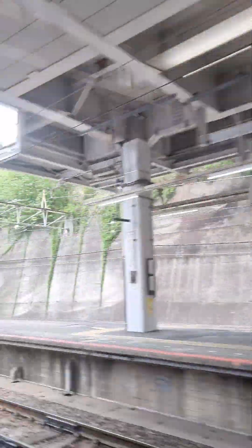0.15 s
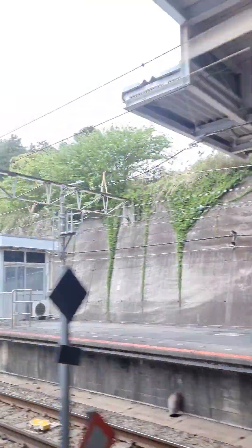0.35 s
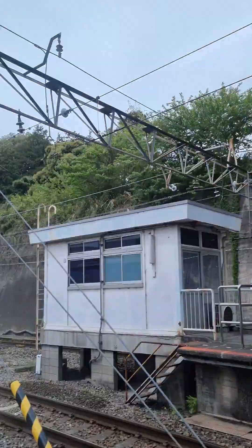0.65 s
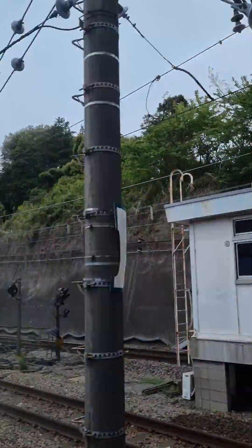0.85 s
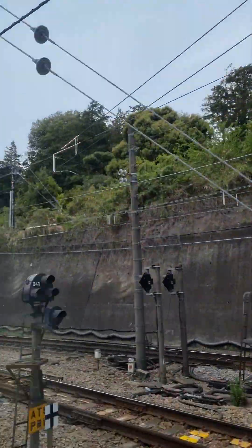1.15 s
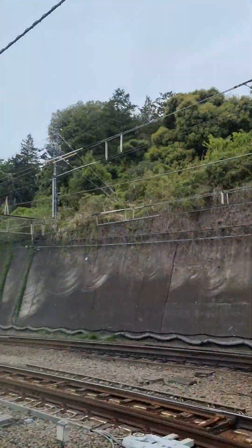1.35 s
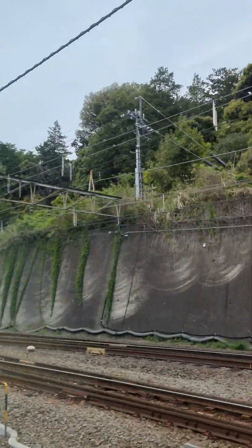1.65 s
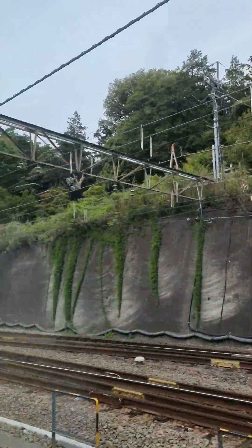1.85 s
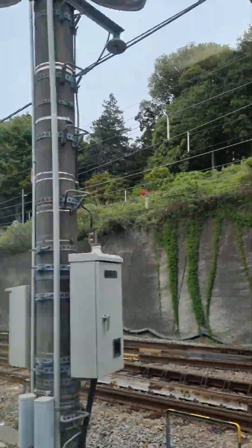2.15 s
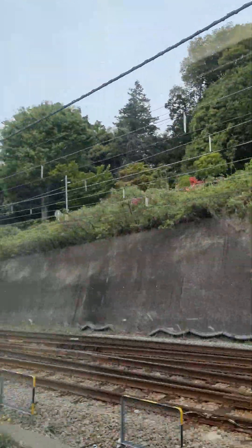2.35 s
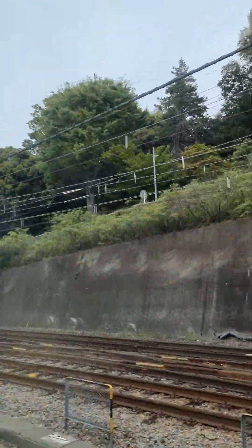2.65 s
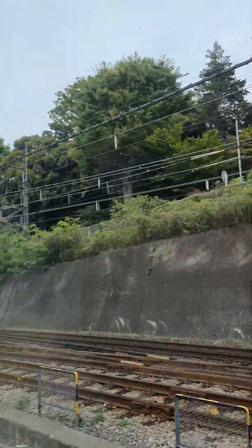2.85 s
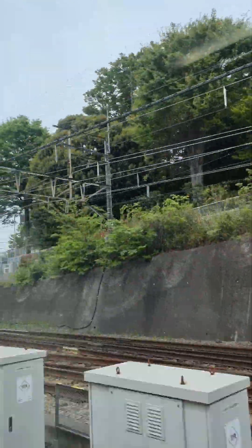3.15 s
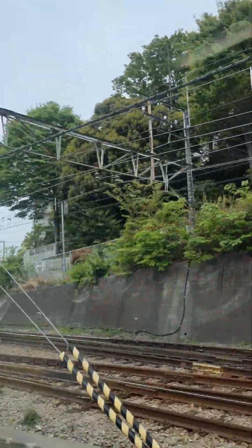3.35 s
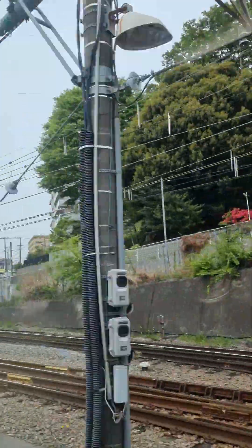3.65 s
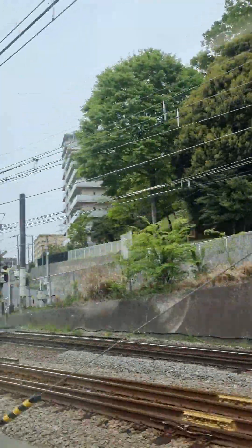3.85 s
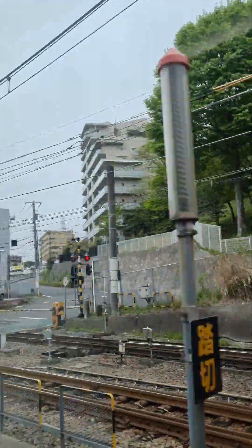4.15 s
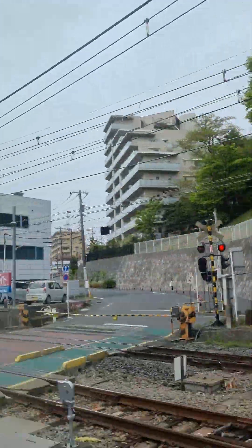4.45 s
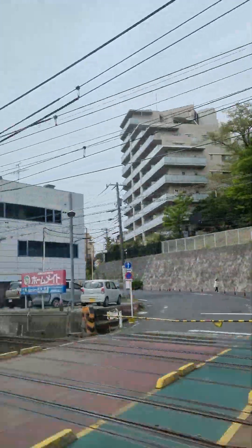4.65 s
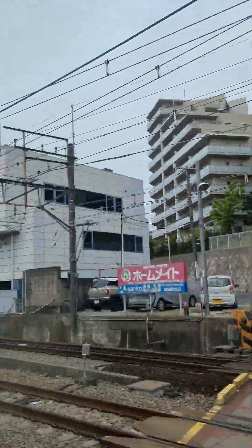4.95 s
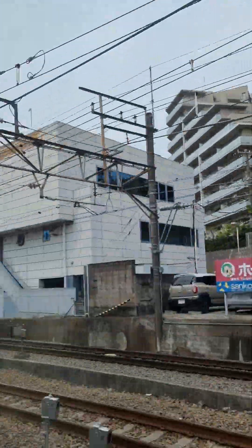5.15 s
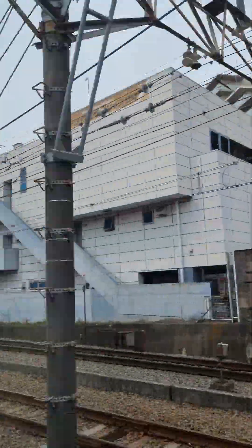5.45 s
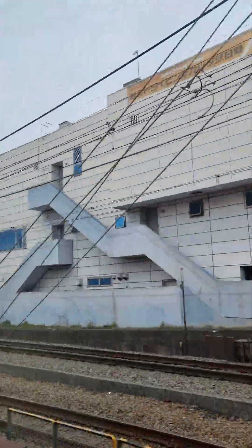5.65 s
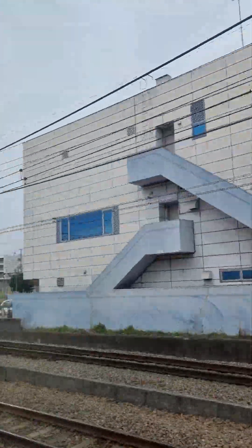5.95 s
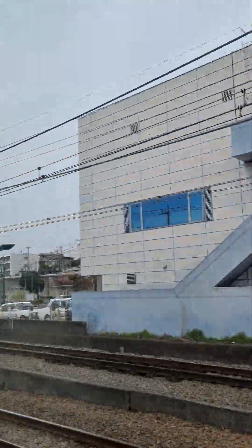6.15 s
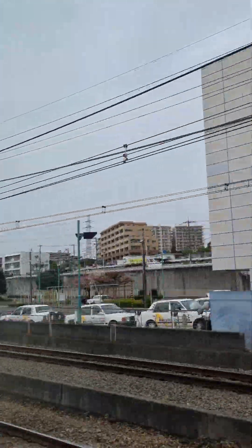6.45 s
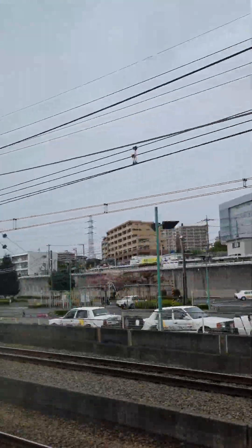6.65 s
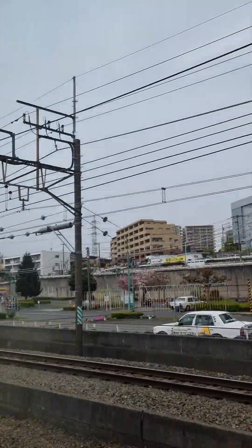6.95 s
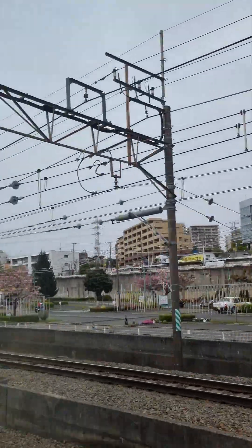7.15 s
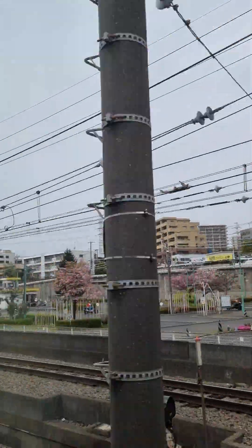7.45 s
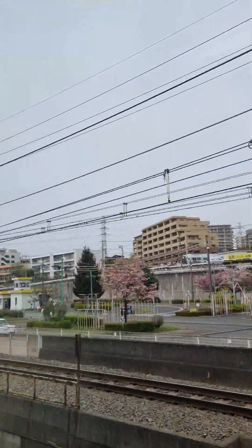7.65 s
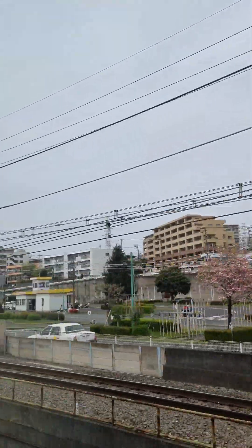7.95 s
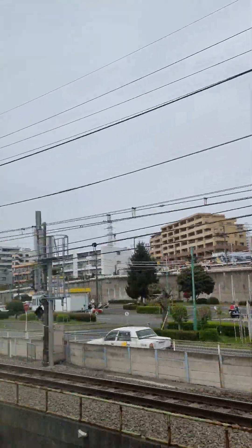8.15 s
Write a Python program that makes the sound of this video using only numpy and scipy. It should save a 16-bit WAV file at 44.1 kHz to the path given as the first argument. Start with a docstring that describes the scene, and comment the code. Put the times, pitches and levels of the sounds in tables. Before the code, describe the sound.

Inside an electric train carriage, close and bass-heavy in stereo. From 0 s a low floor hum near 60 Hz and soft rolling roar continue under small bright rattles and metallic ticks; a thin, faint motor whine wobbles and mostly fades by 1.5 s. Paired thuds come at 0.7 and 1.7 s. Between 2.0 and 2.4 s wheels hit points hard, with booming blows, panel knocks and dull ringing clanks. Roar dips, then two more heavy clusters strike around 3.1-3.4 and 3.5-3.8 s, the loudest, with dense trembling of loose parts. Lighter thuds follow at 4.2 and 4.7 s, one at 5.5 s. Then the ride smooths into steady rumble, with a sharp rattle at 6.1 s. Short quiet crackling air puffs appear from 4.2 s, more regularly from 6 to 8 s. Weak knocks come at 7.8 and 8.2 s, with a barely audible high squeak from 8.1 s.

```python
"""Wheel blows over points and joints thud through the floor of an electric train, then become sparse.
Decaying noise and struck resonances make the thuds, panel knocks, wheel clatter, rattles and clanks.
Filtered noise that follows the ride makes rumble, roar and hiss; noise bands and wavering tones hum.
A motor whine of two sine lines fades early; short puffs of crackling hiss, perhaps from an air valve,
come in a row in the second half, and a faint squeak of high overtones sounds close to the end."""
import sys
import numpy as np
from scipy import signal
from scipy.fft import rfft, irfft, next_fast_len
from scipy.io import wavfile

SR = 44100
rng = np.random.default_rng(int(sys.argv[2]) if len(sys.argv) > 2 else 0)


def wav_out(sig):
    """Save sig, one row per channel (or a flat mono array), as 16-bit PCM at SR to the path in sys.argv[1]."""
    wavfile.write(sys.argv[1], SR, np.round(np.clip(np.atleast_2d(sig).T, -1, 1) * 32767).astype(np.int16))


N = 366012

# the ride between blows: time_s, wheel_roar_db, rail_song_db, body_boom_db
RIDE = [(0.0, -36.5, -50, -38.5), (0.58, -35.5, -50, -33.5), (0.74, -28, -50.5, -25.5),
        (0.95, -36, -51.5, -28), (1.52, -36, -48.5, -30), (2.12, -23.5, -40, -19),
        (2.24, -24, -48.5, -26.5), (2.31, -23.5, -41.5, -21), (2.6, -27.5, -46.5, -27),
        (2.75, -30.5, -52, -27), (2.82, -29.5, -44.5, -29), (3.19, -19, -41, -16),
        (3.54, -28.5, -46.5, -33.5), (3.86, -17, -44.5, -16), (4.02, -23, -44.5, -20),
        (4.25, -31, -54, -34.5), (4.32, -27, -46, -21.5), (4.74, -30, -45, -26), (5.6, -28.5, -43.5, -29),
        (6.05, -32, -45, -27), (6.66, -32, -45, -28.5), (7.86, -31, -45, -34), (8.3, -34, -47, -29)]
# wheel blows at joints: start_s, level_db, t60_s
WHEEL_BLOWS = [(0.659, -19.5, 0.44), (0.749, -18.5, 0.34), (1.249, -29, 0.4), (1.636, -19, 0.36),
               (1.716, -18, 0.78), (2.027, -19.5, 0.37), (2.072, -12, 0.32), (2.135, -17.5, 0.36),
               (2.294, -9.5, 0.34), (2.373, -6, 0.32), (2.783, -15.5, 0.23), (2.854, -12.5, 0.42),
               (3.108, -16, 0.41), (3.255, -9, 0.38), (3.329, -6, 0.33), (3.502, -19, 0.41),
               (3.594, -11.5, 0.27), (3.734, -6.5, 0.46), (3.817, -4, 0.27), (4.159, -21, 0.33),
               (4.239, -18, 0.41), (4.682, -14.5, 0.5), (4.768, -12, 0.24), (5.54, -21, 0.22),
               (7.767, -24.5, 0.28), (8.235, -27, 0.25)]
# resonances of the floor panels: pitch_hz, level_db, t60_s
PANEL_MODES = [(380, 5.5, 0.041), (515.8, -9, 0.11), (631, -16.5, 0.16), (860, -18.5, 0.039)]
# small parts trembling: time_s, level_db
TREMBLE_LEVEL = [(0.0, -64), (0.35, -66.5), (0.55, -62.5), (1.31, -67), (1.85, -59), (2.7, -60.5),
                 (3.23, -54.5), (4.16, -65), (4.88, -66), (5.34, -69), (7.93, -68), (8.3, -70)]
# noise spectrum of the highest treble: pitch_hz, level_db (per Hz, relative)
TOP_SPECTRUM = [(7000, -120), (9000, -37), (10500, -5.5), (12500, -3), (15500, -4.5)]


def from_db(db):
    """Amplitude gain is ten to the power of decibels over twenty."""
    return 10 ** (np.asarray(db) / 20)


def rms_one(x):
    """Normalize the mean power to 1."""
    return x / np.sqrt(np.mean(x ** 2) + 1e-20)


def in_time(rows):
    """Linear interpolation turns each column after the time column into a curve over all samples."""
    s, *columns = np.transpose(rows)
    return [np.interp(np.arange(N) / SR, s, column) for column in columns]


def at_hz(points, hz):
    """A spectral envelope is interpolated along a logarithmic frequency axis."""
    table_hz, table_db = np.array(points)[:, 0], np.array(points)[:, 1]
    return np.interp(np.log(hz + 1), np.log(table_hz + 1), table_db)


def drift(rate_hz):
    """Slow random modulation: white noise through two equal one-pole low-passes, rms 1."""
    step, settle = 40, 2000   # samples between drawn points; points dropped while the filter settles
    r = np.exp(-2 * np.pi * rate_hz * step / SR)
    white = rng.standard_normal(N // step + settle + 2)
    slow = signal.lfilter([1], [1, -2 * r, r * r], white)[settle:]
    return np.interp(np.arange(N) / step, np.arange(len(slow)), rms_one(slow))


def noise(spectrum):
    """Diffuse field: stereo noise whose colour, correlation and balance vary with frequency; mid rms 1."""
    # correlation of the two sides: pitch_hz, left_right_likeness
    likeness = [(60, 0.97), (110, 1), (200, 0.98), (380, 0.29), (700, -0.63), (1290, -0.66), (2380, -0.06),
                (4400, -0.13), (8120, -0.08), (15000, 0.01)]
    # balance of the two sides: pitch_hz, left_minus_right_db
    balance = [(60, -5), (150, -1.2), (380, -6.5), (950, -2), (2380, -8), (5980, -3.5), (15000, 0.3)]
    size = next_fast_len(N)
    hz = np.arange(size // 2 + 1) * SR / size
    mid, side = rfft(rng.standard_normal((2, size)))
    alike = np.clip(at_hz(likeness, hz), -.95, .995)
    side = side * np.sqrt((1 - alike) / (1 + alike))   # this ratio of powers sets the correlation
    side_gains = from_db(np.outer([.5, -.5], at_hz(balance, hz)))
    colour = from_db(at_hz(spectrum, hz))
    pair = irfft(colour * side_gains * [mid + side, mid - side], size)[:, :N]
    return pair / np.sqrt(np.mean(pair.mean(axis=0) ** 2))


def decays(times, levels_db, t60s, rise_s):
    """Reverberant decay: each blow rises quickly and falls exponentially; the powers add."""
    power, t = np.zeros(N + SR), np.arange(SR) / SR
    for s, db, t60 in zip(times, levels_db, t60s):
        at = round(s * SR)
        fall = from_db(db - 60 * t / max(t60, .02))
        power[at:at + SR] += (fall * (1 - np.exp(-t / rise_s))) ** 2
    return np.sqrt(power[:N])


def wavering_tone(hz, db, waver_db, rate_hz):
    """Amplitude modulation: a sine of given rms level, its phase the sum of its pitch, wavers at random."""
    level = np.sqrt(2) * from_db(db + waver_db * drift(rate_hz))
    return level * np.sin(2 * np.pi * np.cumsum(hz) / SR)


def ring(s, db, hz, t60):
    """Modal resonance: contacts softened by a low-pass set one damped mode ringing at times s."""
    clicks = np.full(N, 1e-18)
    clicks[np.round(np.multiply(s, SR)).astype(int)] = from_db(db)
    contact = signal.sosfilt(signal.butter(4, 1.25 * hz, fs=SR, output="sos"), clicks)
    r, w = from_db(-60 / (t60 * SR)), 2 * np.pi * hz / SR
    return signal.lfilter([0, np.sin(w)], [1, -2 * r * np.cos(w), r * r], contact)


def struck(modes, s, db, spread_db):
    """Modal superposition: every blow excites every mode with a random strength of its own."""
    chance_db = rng.normal(0, spread_db, (len(s), len(modes)))
    rings = [ring(s, db + mode_db + chance_db[:, k], hz, t60) for k, (hz, mode_db, t60) in enumerate(modes)]
    return sum(rings)


def follows(db, share, fade_db_per_s=0):
    """Level coupling: db is shifted by a share of the roar's swing about its mean and by a steady fade."""
    roar_db = in_time(RIDE)[0]
    fade_db = fade_db_per_s * (np.arange(N) - N / 2) / SR   # zero at mid-ride
    return db + share * (roar_db - roar_db.mean()) - fade_db


def floor_line():
    """Narrow-band tone: a low, fairly steady hum of the floor wanders a little in pitch."""
    # low floor tone: time_s, level_db
    floor_level = [(0, -32.5), (1.0, -33), (1.5, -36), (2.2, -28.5), (2.8, -30), (3.6, -32.5), (4.5, -28),
                   (5.2, -31.5), (5.8, -31.5), (8.3, -34)]
    hz = 58.5 + 1.6 * drift(2.99)
    return wavering_tone(hz, in_time(floor_level)[0], waver_db=1.2, rate_hz=5.3) * from_db([[1], [-1]])


def carriage():
    """Broadband rolling noise: hum, boom, roar, song and hiss; a shared roughness moves the last three."""
    # noise spectra of five layers: pitch_hz, level_db (per Hz, relative)
    hum_spectrum = [(10, -39.5), (20, -11), (32, -9.5), (44, -10.5), (58, -6.5), (68, -5.5), (78, -6.5),
                    (90, -18.5), (130, -59.5), (250, -130)]
    boom_spectrum = [(45, -46.5), (70, -12), (84, -1), (98, 1), (112, 1.5), (124, -7), (140, -15.5),
                     (180, -27), (300, -87), (500, -130)]
    roar_spectrum = [(76, -20.5), (130, -0.5), (134, -6), (156, 1), (178, -2), (215, 1), (275, -2),
                     (295, -12.5), (318, -5.5), (363, -7.5), (450, -14.5), (527, -18), (620, -27),
                     (810, -63), (1360, -120)]
    song_spectrum = [(330, -47.5), (560, 3), (623, -1.5), (678, 0), (808, -4), (912, -5), (1060, -7.5),
                     (1190, -9.5), (1440, -18.5), (1700, -24), (2210, -53.5), (3740, -120)]
    hiss_spectrum = [(710, -29), (1200, -14), (1460, -11), (1830, -5), (2360, -11.5), (2870, -12),
                     (3480, -15), (6860, -23.5), (7720, -26), (8140, -43.5), (8590, -67.5), (12500, -50),
                     (15700, -45)]
    roar_db, song_db, boom_db = in_time(RIDE)
    hum_db = follows(-29, share=0.65)
    hiss_db = follows(-58.5, share=0.45, fade_db_per_s=0.41)
    # each blow also swells song and hiss
    s, db, _ = np.transpose(WHEEL_BLOWS)
    jolt = decays(s, db, np.full(len(s), 0.34), rise_s=0.0085)
    shake = drift(10.9)   # track roughness
    bass = from_db(hum_db) * noise(hum_spectrum) + floor_line() + from_db(boom_db) * noise(boom_spectrum)
    roar = from_db(roar_db + 1.1 * shake) * noise(roar_spectrum)
    song_level = np.hypot(from_db(song_db), from_db(-25) * jolt)
    song_level = song_level * from_db(1.2 * shake + 0.51 * drift(13))
    hiss_level = np.hypot(from_db(hiss_db), from_db(-39) * jolt)
    hiss_level = hiss_level * from_db(1.9 * shake + 0.97 * drift(5.0))
    return bass + roar + song_level * noise(song_spectrum) + hiss_level * noise(hiss_spectrum)


def bands():
    """Quadrature modulation: slow noise on sine and cosine makes humming bands that drift and swell."""
    # humming bands of the running gear: pitch_hz, width_hz, level_db (at mean roar), wander_hz
    hum_bands = [(108.36, 8.1, -34.5, 6.0), (204.6, 30, -43.5, 12.0), (357, 32, -40.5, 12.0),
                 (540, 40, -53.5, 27), (815, 58, -59, 40.0)]
    out = 0
    for hz, width_hz, db, wander_hz in hum_bands:
        turn = 2 * np.pi * np.cumsum(hz + wander_hz * drift(.8)) / SR
        first, second = (drift(width_hz) * np.sin(turn) + drift(width_hz) * np.cos(turn) for _ in range(2))
        pair = np.array([first, 0.63 * first + 0.35 * second])   # the sides are partly alike
        out = out + from_db(db + 2.8 * drift(1.5)) * pair
    return from_db(follows(0, share=.4)) * out


def whine():
    """Tonal motor noise: two lines wobble in pitch and die away as the drive eases off; the lower swells."""
    # lower line: time_s, level_db
    whine_level = [(0, -61), (.08, -59), (.2, -68), (.33, -62), (.42, -64), (.55, -58.5), (.66, -57),
                   (.73, -69), (.83, -57.5), (.94, -71), (1.03, -60), (1.34, -60), (1.4, -71), (2.4, -70),
                   (2.6, -63.5), (3.2, -68.5)]
    upper_end_s = 1.55
    t, (lower_db,) = np.arange(N) / SR, in_time(whine_level)
    lower_hz = 1803 + 8.5 * t + 4 * drift(25)   # rises by 8.5 Hz per s
    lower = wavering_tone(lower_hz, lower_db, waver_db=3.0, rate_hz=25)
    lower = lower * np.clip((whine_level[-1][0] - t) / 0.48, 0, 1)
    upper_hz = 2470 + 10 * drift(20)
    upper_db = -65.5 - 3.5 * t   # fades by 3.5 dB per s
    upper = wavering_tone(upper_hz, upper_db, waver_db=2.0, rate_hz=15)
    upper = upper * np.clip((upper_end_s - t) / .2, 0, 1)
    return (lower + upper) * from_db([[2.2], [-2.2]])


def sizzle():
    """High-frequency friction noise: the faint top of the trembling parts follows the chatter's level."""
    return from_db(in_time(TREMBLE_LEVEL)[0] - 24.0 + 2.5 * drift(8)) * noise(TOP_SPECTRUM)


def chatter(per_s=150.):
    """Random impact process: trembling parts touch densely and unevenly, independently on each side."""
    # resonances of the small parts: pitch_hz, level_db, t60_s
    part_modes = [(2570, 1.5, 0.017), (2767, -1.5, 0.039), (2990, -1.5, 0.024), (3150, -7, 0.028)]
    sides = []
    for _ in range(2):
        s = np.flatnonzero(rng.random(N) < per_s / SR) / SR
        sizes_db = 1.8 * np.minimum(rng.exponential(1, len(s)), 4)
        sides.append(rms_one(struck(part_modes, s, sizes_db, spread_db=3.5)))
    level_db = in_time(TREMBLE_LEVEL)[0] + 1.5 * drift(5.1)
    return from_db(level_db) * np.array(sides) * from_db([[3.5], [-1.5]])


def squeak(fade_s=.015):
    """Harmonic series: three overtones of a faint arching squeak come and go, without the fundamental."""
    # path of the squeak: time_s, fundamental_hz, level_db
    squeak_path = [(8.09, 1560, -100), (8.115, 1620, -86), (8.15, 1670, -90), (8.185, 1830, -82),
                   (8.24, 1860, -81), (8.285, 1650, -88)]
    # overtones that sound: multiple, level_db, start_s, end_s
    overtones = [(6, -5, 8.16, 8.25), (7, 0, 8.09, 8.29), (8, 2, 8.22, 8.28)]
    t, (hz, db), out = np.arange(N) / SR, in_time(squeak_path), 0
    for multiple, line_db, start, end in overtones:
        gate = np.clip(np.minimum(t - start, end - t) / fade_s, 0, 1)
        out = out + gate * wavering_tone(multiple * hz, db + line_db, waver_db=4.0, rate_hz=60)
    return out


def puffs(rise_s=0.0099, fall_s=0.033):
    """Turbulent flow noise: each air burst swells softly, holds a crackling flow and ends more softly."""
    # puffs of hiss: start_s, level_db, held_s
    bursts = [(4.1724, -55.5, 0.025), (4.441, -51.5, 0.072), (4.9094, -56.5, 0.038), (6.0794, -54.5, 0.093),
              (6.458, -59, 0.012), (6.549, -52, 0.076), (6.889, -52.5, 0.085), (7.179, -53, 0.064),
              (7.417, -52, 0.044), (7.645, -53, 0.078), (7.8894, -51.5, 0.08)]
    # noise spectrum of the air: pitch_hz, level_db (per Hz, relative)
    air_spectrum = [(1060, -31.5), (1800, 4), (1990, -7), (2220, 0), (3150, -1.5), (3400, 6), (3800, -1),
                    (4200, 2.5), (4400, -1), (4660, 2), (5300, -0.5), (5800, -4), (7200, -1.5), (7990, -8),
                    (8670, -21), (12900, -11.5), (15600, -12.5)]
    grains_per_s, grain_share = 1500., .12
    t, flow = np.arange(N) / SR, np.zeros(N)
    for s, db, held in bursts:
        since = np.maximum(t - s, 0)
        swell = 1 - np.exp(-since / rise_s)
        flow += from_db(db) * swell * np.exp(-np.maximum(since - held, 0) / fall_s)
    grain_sizes = from_db(3.5 * np.minimum(rng.exponential(1, N), 4))
    grains = (rng.random(N) < grains_per_s / SR) * grain_sizes
    crackle = rms_one(signal.lfilter([1], [1, -.97], grains))
    grainy = 1 - grain_share + grain_share * crackle
    return flow * rms_one(grainy) * from_db(2.0 * drift(30)) * noise(air_spectrum)


def rattles():
    """Impact noise: a loose fitting gives a bright and a dull dying hiss, a top crack and a short ring."""
    # knocks of loose fittings: start_s, level_db, dull_part_db, top_crack_db
    knocks = [(0.0334, -47, -62, -82), (0.1154, -38, -43.5, -74), (0.25, -42, -46, -78),
              (0.408, -34, -40.5, -72), (0.6184, -49, -59, -78), (0.751, -45, -50, -69),
              (0.9662, -46, -51, -69), (0.9827, -38.5, -43, -61), (1.217, -45, -66, -59),
              (2.035, -42, -41, -78), (2.0634, -58, -41, -79), (2.135, -50, -42, -81),
              (2.2967, -51, -39, -87), (2.3792, -37.5, -42, -69), (2.651, -39, -46, -68),
              (2.759, -37.5, -46, -73), (2.7926, -38, -55, -75), (3.0384, -56, -40, -84),
              (3.105, -50, -40, -81), (3.148, -43, -43, -81), (3.2525, -53, -39, -78),
              (3.337, -44, -36, -81), (3.4025, -34.5, -42.5, -66), (3.4371, -42.5, -57, -67),
              (3.5144, -59, -42.5, -77), (3.5754, -49, -43, -73), (3.6634, -43, -54, -73),
              (3.73, -36.5, -38, -64), (3.8177, -51, -38, -77), (4.133, -42.5, -62, -57),
              (4.207, -32, -36.5, -64), (4.317, -39, -48.5, -81), (4.4558, -35, -42.5, -60),
              (4.554, -41, -44, -75), (4.8296, -38.5, -42, -82), (4.9232, -43, -50, -70),
              (4.971, -49, -49.5, -72), (5.121, -43, -46.5, -88), (5.3106, -39.5, -41.5, -80),
              (5.8132, -41.5, -59, -73), (6.0644, -29.5, -45, -48), (6.2173, -48, -59, -76),
              (6.2674, -43, -63, -81), (6.3, -44, -51, -85), (7.6136, -48, -63, -74),
              (7.8585, -46, -61, -82), (7.883, -44, -50, -69)]
    # noise spectra of the bright and the dull part: pitch_hz, level_db (per Hz, relative)
    bright_spectrum = [(1200, -61), (2200, -18.5), (3150, 0.5), (3700, -1.5), (4600, 0.5), (4950, -3),
                       (5380, 0.5), (5750, -5.5), (7600, -8), (8300, -18.5), (9000, -45.5), (12000, -120)]
    dull_spectrum = [(500, -68), (1100, -13), (1750, -6.5), (1950, -0.5), (2200, -5), (2500, -4.5),
                     (2830, -1), (3300, -7.5), (5000, -19.5), (7000, -45.5), (10000, -120)]
    # resonances of a fitting: pitch_hz, level_db, t60_s
    fitting_modes = [(3770, -14.5, 0.02), (4030, -8.5, 0.02), (4730, -13.5, 0.03), (5360, -11.5, 0.04),
                     (6930, -14.5, 0.02)]
    s, db, dull_db, crack_db = np.transpose(knocks)
    same = np.ones(len(s))   # one decay time in s for all knocks
    tick = decays(s, db - 10, .13 * same, rise_s=0.0034) * noise(bright_spectrum)
    tock = decays(s, dull_db - 1.5, .144 * same, rise_s=0.0045) * noise(dull_spectrum)
    crack = decays(s, crack_db, .06 * same, rise_s=.001) * noise(TOP_SPECTRUM)
    fitting = struck(fitting_modes, s, db - 1.5, spread_db=0.0) * from_db([[2.5], [-2.5]])
    return tick + tock + crack + fitting


def clanks():
    """Beating of close modes: a main ring has two shorter neighbours and a faint, longer afterring."""
    # clanking metal parts: start_s, level_db, pitch_hz, t60_s
    metal_parts = [(.118, -46, 2450, 0.07), (.2515, -33.5, 2470, 0.085), (.432, -36.5, 2470, 0.085),
                   (.509, -44.5, 3020, 0.1), (.752, -50, 2950, .1), (.984, -34, 2490, 0.08),
                   (.983, -37, 2780, 0.054), (1.4, -45.5, 2720, 0.087), (2.073, -18.5, 512, 0.13),
                   (2.312, -20.5, 533, .1), (2.379, -19.5, 534, .1), (3.334, -44, 2950, 0.16),
                   (4.524, -30, 570, .25), (4.774, -21, 489, 0.092), (4.82, -25.5, 587, 0.45),
                   (5.54, -32, 797, 0.22), (6.301, -40, 2130, 0.03), (7.268, -45, 1800, .07),
                   (7.77, -33, 844, .18), (7.885, -39.5, 3920, 0.037)]
    out = 0
    for s, db, hz, t60 in metal_parts:
        near_db = db - (10.5 if hz < 1000 else 0)   # weaker neighbours on low, heavy parts
        out = out + ring(s, db - 4.5, hz, t60)
        out = out + ring(s + 0.0054, near_db - 8.5, .955 * hz, .9 * t60)
        out = out + ring(s, near_db - 6, 1.035 * hz, .7 * t60)
        out = out + ring(s + .002, db - 21, hz, 2.5 * t60)
    return out * from_db([[2.5], [-2.5]])


def bumps(per_s=14.):
    """Random excitation: small rail flaws knock the floor panels, independently on each side."""
    sides = []
    for _ in range(2):
        s = np.flatnonzero(rng.random(N) < per_s / SR) / SR
        sides.append(struck(PANEL_MODES, s, np.full(len(s), 0.5), spread_db=3.5))
    return from_db(in_time(RIDE)[0]) * np.array(sides) * from_db([[1.5], [-1.5]])


def clatter():
    """Repeated impact: each blow is a run of five weakening touches that ring wheel and bogie."""
    # resonances of wheel and bogie: pitch_hz, level_db, t60_s
    wheel_modes = [(486, 6.5, 0.083), (820, -1.5, 0.051), (1247, -2.5, .07), (1560, -7.5, .06),
                   (1952, -5, 0.083), (2650, -8.5, .07), (2870, -7.5, .09), (3670, -13, .05)]
    spacing_s, loss_db = .011, 2.5   # nominal time and loss from touch to touch
    s, db, _ = np.transpose(WHEEL_BLOWS)
    touch = np.arange(5)
    uneven = rng.uniform(0, .8, (len(s), 5)) * (touch > 0)   # the first touch is on time
    times = s[:, None] + spacing_s * (touch + uneven)
    levels_db = db[:, None] - 33 - loss_db * touch
    near, far = (struck(wheel_modes, times.ravel(), levels_db.ravel(), spread_db=4.5) for _ in range(2))
    return np.array([near + .4 * far, .6 * far - .4 * near])


def joints():
    """Structure-borne impact: a wheel blow shakes floor and walls into a broad thud and knocks the panels."""
    # noise spectrum of the thud: pitch_hz, level_db (per Hz, relative)
    thud_spectrum = [(59, -35.5), (100, 1.5), (250, -2), (295, -2.5), (353, 0), (429, -7.5), (531, -12.5),
                     (973, -34), (1970, -38), (2350, -48.5), (2820, -40.5), (5000, -58.5), (6500, -83.5),
                     (11000, -120)]
    s, db, t60 = np.transpose(WHEEL_BLOWS)
    knock = struck(PANEL_MODES, s, db - 14.5, spread_db=5.5)
    thud = decays(s, db - 5, t60, rise_s=0.006) * noise(thud_spectrum)
    return thud + knock * from_db([[2.5], [-4.0]])


def scene():
    """Linear superposition: the pressures of all sources add in stereo."""
    running = carriage() + bands() + joints() + clatter() + bumps()
    return running + chatter() + sizzle() + rattles() + clanks() + puffs() + whine() + squeak()


def record(dry):
    """Soft saturation rounds the loudest blows; a steep low-pass then cuts the top."""
    cutoff_hz = 15780
    rounded = 1.6 * np.tanh(dry / 1.6)
    return signal.sosfilt(signal.ellip(12, .5, 90, cutoff_hz, fs=SR, output="sos"), rounded)


dry = scene()
out = record(dry)
wav_out(out)
```